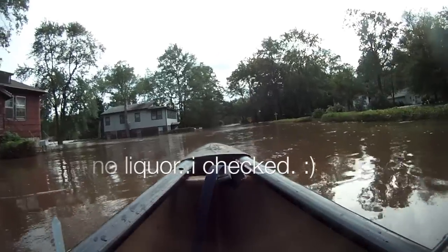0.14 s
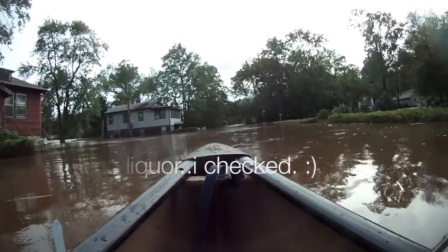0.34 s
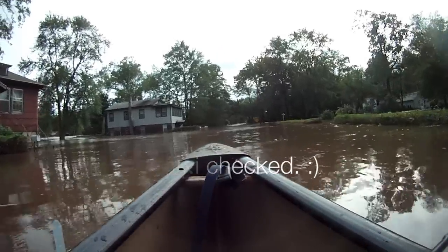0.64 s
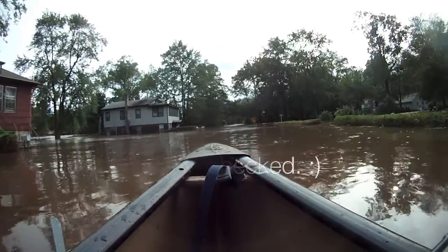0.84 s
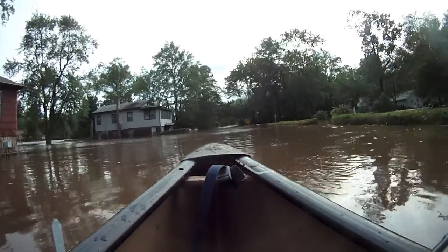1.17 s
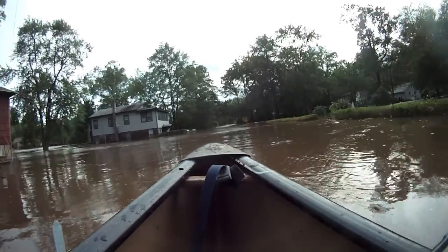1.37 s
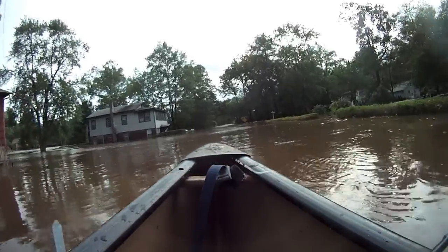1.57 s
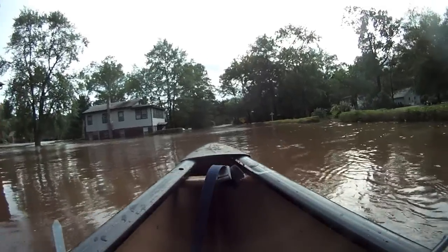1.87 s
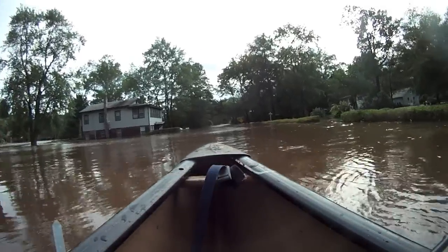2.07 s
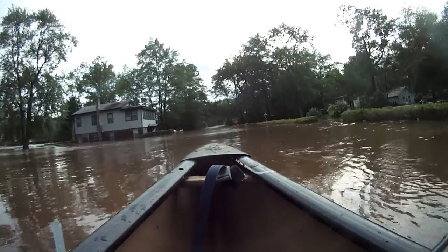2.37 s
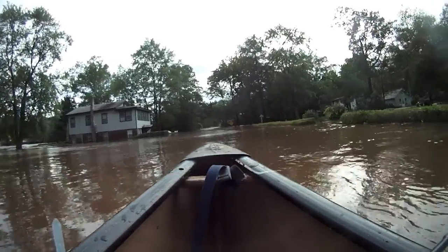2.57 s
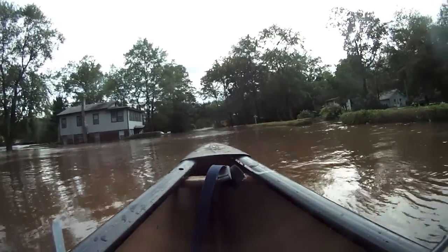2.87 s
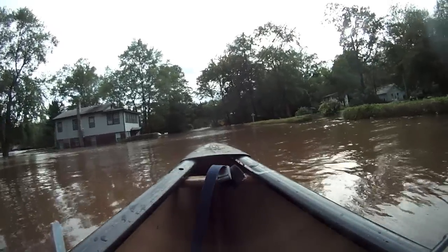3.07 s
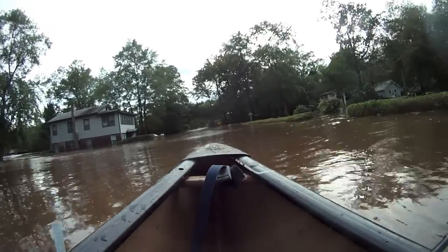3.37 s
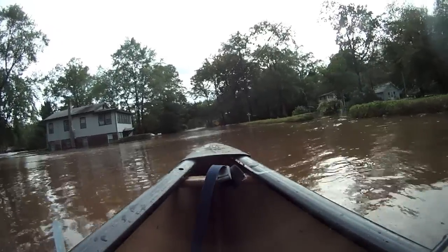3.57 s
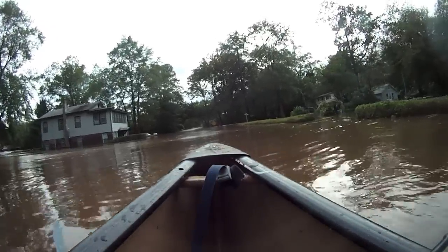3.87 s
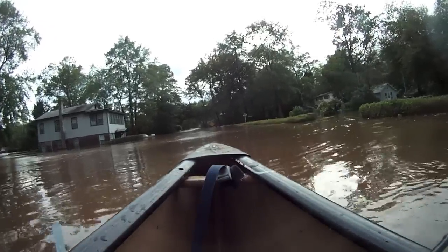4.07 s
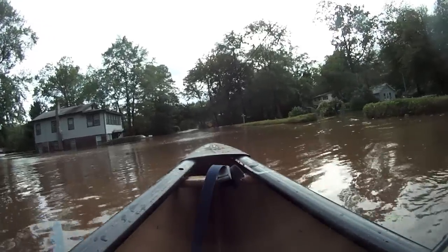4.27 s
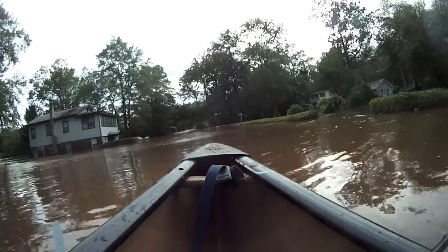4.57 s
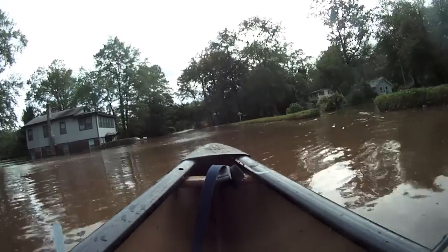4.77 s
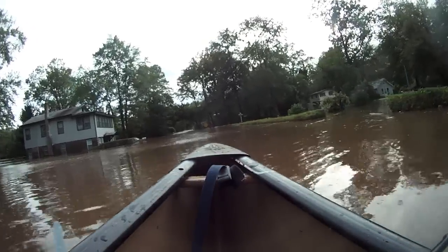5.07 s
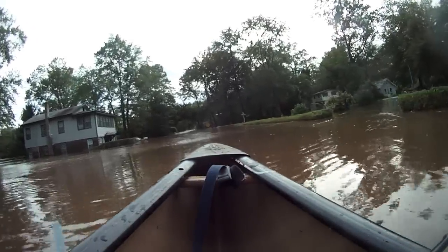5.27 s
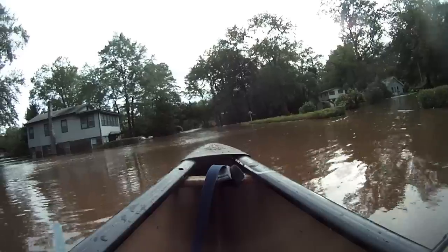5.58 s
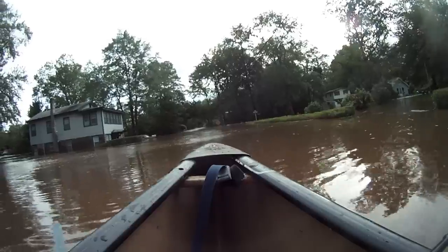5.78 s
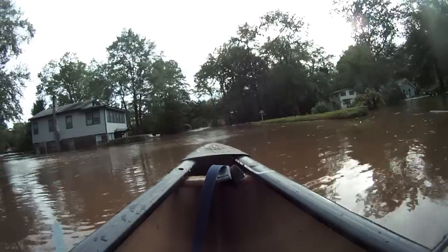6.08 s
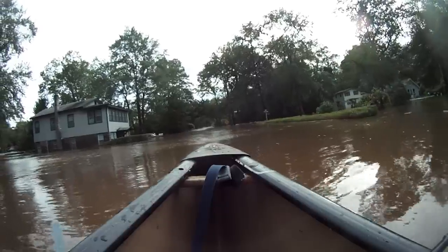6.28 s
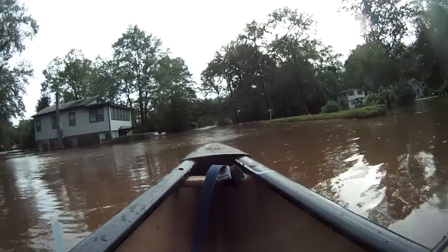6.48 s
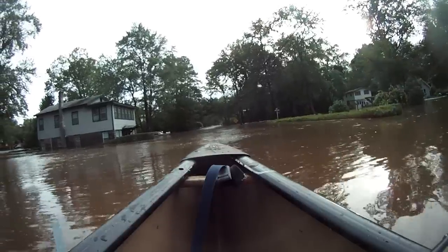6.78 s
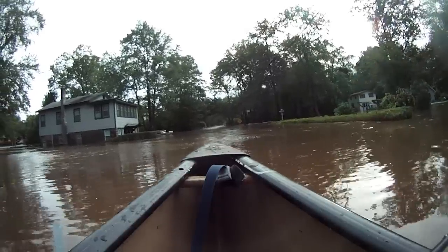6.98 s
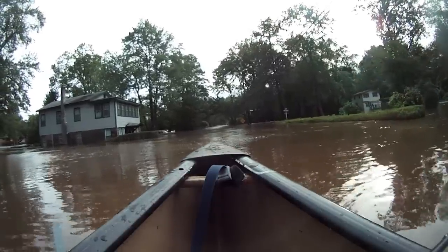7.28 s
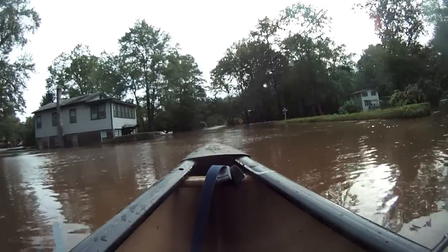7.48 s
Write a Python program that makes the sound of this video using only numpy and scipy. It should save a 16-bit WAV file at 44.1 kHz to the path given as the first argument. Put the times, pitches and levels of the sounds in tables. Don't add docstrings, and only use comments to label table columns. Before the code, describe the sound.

Quiet floodwater laps along a drifting canoe, close and boxed-in inside a waterproof case. Small bumps lead to one dominant, deep, soft-edged hull thump, followed by rumbling and plinking droplets. The water then thins, with scattered low knocks and wavelet slaps, a firmer fluttering cluster late on, and a final patter of drips and light taps. The sound is nearly mono, with gritty, coarse treble.

```python
import sys
import numpy as np
from scipy import signal
from scipy.fft import rfft, irfft, next_fast_len
from scipy.io import wavfile
from scipy.ndimage import uniform_filter1d, map_coordinates

SR = 44100
rng = np.random.default_rng(int(sys.argv[2]) if len(sys.argv) > 2 else 0)


def dump_mix(stems):
    frames = np.atleast_2d(stems).T
    limited = np.clip(frames, -1, 1)
    pcm = np.round(limited * 32767).astype(np.int16)
    wavfile.write(sys.argv[1], SR, pcm)


def to_linear_factor(level_db):
    exponent = np.asarray(level_db, float) / 20
    return 10 ** exponent


N = 336483

# f/Hz, arrival delay/s, swell time/s, pitch wander/Hz, twin mode f/Hz, twin level/dB
HULL_MODES = [
    (40.3, 0.024, 0.042, 1.16, 33, -18),
    (63, 0.0053, 0.063, 1.493, 44, -12.5),
    (81.6, 0.0076, 0.043, 2.54, 96, -9.5),
    (113.4, 0.0018, 0.02, 3.93, 132, -13),
    (171.3, 0.0013, 0.02, 10, 215, -4),
]
# f/Hz, level/dB per Hz
CASE_RESPONSE = [(820, -33.5), (1400, -12), (1520, -12), (1840, -10.5), (2050, -2), (2180, -0.5),
                 (2590, -9), (2810, -11), (3070, -4), (3410, -8), (3630, -5), (4430, -13), (5410, -15),
                 (6010, -35.5), (6200, -18), (8060, -59.5), (13600, -120)]


def unit(x):
    return x / np.sqrt(np.mean(x ** 2) + 1e-20)


def wobble(rate):
    knots = rng.standard_normal(int(N * rate / SR) + 4)
    return map_coordinates(knots, [np.arange(N) * rate / SR])


def coloured(x, points):
    m = 2 * next_fast_len(N // 2 + 4096)
    hz, db = np.transpose(points)
    log_hz = np.log(np.fft.rfftfreq(m, 1 / SR) + 1)
    gain = to_linear_factor(np.interp(log_hz, np.log(hz + 1), np.maximum(db, -90)))
    cepstrum = irfft(np.log(gain), m)
    cepstrum[1:m // 2] *= 2
    cepstrum[m // 2 + 1:] = 0
    return irfft(rfft(x, m) * np.exp(rfft(cepstrum)), m)[:N]


def add(into, s, sound):
    start = round(s * SR)
    sound = sound[max(-start, 0):]
    part = into[max(start, 0):][:len(sound)]
    part += sound[:len(part)]


def swell(t, rise):
    return t / rise * np.exp(1 - t / rise)


def microphone_hiss():
    # f/Hz, level/dB per Hz
    hiss_shape = [(1000, -26), (3000, -9), (4600, -1), (5550, 5.5), (5950, -22), (6200, -58)]
    return to_linear_factor(-78) * unit(coloured(rng.standard_normal(N), hiss_shape))


def wash():
    # t/s, fizz level/dB
    flow = [(0, -61), (.5, -61), (.9, -60.5), (1.05, -60.5), (1.3, -61), (1.7, -61.5), (2.3, -61.5),
            (3, -62.5), (3.7, -63), (4.5, -64), (5.2, -63), (5.7, -62.5), (6.3, -63.5), (6.75, -63),
            (7.1, -62.5), (7.4, -61.5), (7.63, -62)]
    # t/s, rise/dB, swell time/s
    splashes = [(0.29, 2, 0.0097), (0.455, 4, 0.016), (0.94, 2, 0.033), (1.04, 2, 0.028),
                (2.08, 2.5, 0.024), (2.74, 2.5, 0.045), (4.875, 2, .015), (5.19, 2, 0.014),
                (6.77, 2, 0.013), (7.16, 2.5, .04), (7.41, 2, 0.01), (7.61, 0, .015)]
    # f/Hz, level/dB per Hz
    lapping = [(13, -43.5), (22, 1), (48, -1), (92, -4), (198, -14.5), (480, -20), (1190, -24), (1500, -31),
               (1850, -33), (2200, -22.5), (2860, -42.5), (4840, -120)]
    lap_level_db, lap_follows = -56, 0.36
    t = np.arange(N) / SR
    flow_db = np.interp(t, *np.transpose(flow))
    lift_db = np.zeros(N)
    for s, db, rise in splashes:
        add(lift_db, s, db * swell(t[:SR // 2], rise) ** 2)

    flicker = to_linear_factor(0.22 * wobble(10) + 0.34 * wobble(40) + 0.55 * wobble(250))
    fizz = unit(coloured(flicker * rng.standard_normal(N), CASE_RESPONSE))
    lap = unit(coloured(to_linear_factor(0.6 * wobble(14)) * rng.standard_normal(N), lapping))
    lap_db = lap_level_db + lap_follows * (flow_db - flow_db.mean())
    return to_linear_factor(flow_db + lift_db) * fizz + to_linear_factor(lap_db) * lap


def bumps():
    # t/s, peak level/dB, hardness/dB per mode upward
    blows = [(0.0, -41.5, 1.5), (0.22, -44, -1.5), (0.92, -22.5, -1.5), (0.96, -22.5, -1.5),
             (1.04, -34, 1.5), (1.26, -45, -4), (1.45, -46.5, 0), (1.805, -40, 2), (2.04, -52, 0.5),
             (3.465, -52, 4), (3.515, -44.5, 1), (3.88, -49.5, 2.5), (4.365, -47.5, 1.5), (5.765, -47, 5.5),
             (7.37, -55, 0.5), (7.49, -56, 6)]
    blow_db = [0.5, -6, -7, -14.5, -28]
    # t/s, peak level/dB
    rocks = [(0.09, -39), (0.405, -42), (0.58, -51), (1.15, -36), (1.6, -51), (1.86, -42), (2.64, -54),
             (2.76, -49.5), (2.84, -46), (3.1, -52), (3.64, -50), (3.78, -50), (4.375, -42), (5.06, -56),
             (5.17, -53), (5.78, -45.5), (5.84, -43.5), (5.895, -40), (6.01, -50), (6.16, -44.5),
             (6.405, -46.5), (6.74, -48), (6.95, -60), (7.1, -48.5), (7.23, -55.5)]
    # t/s, peak level/dB, panel f/Hz
    slaps = [(-0.04, -43, 71), (0.07, -47, 96), (0.42, -48.5, 91.5), (0.58, -68, 125), (0.77, -49, 61.7),
             (0.78, -61, 114), (1.15, -49, 82), (1.86, -42, 63), (1.92, -47, 84), (2.5, -48.5, 68),
             (2.76, -57, 62), (3.455, -39, 71.5), (3.64, -51, 82.4), (3.78, -55, 80), (3.94, -44, 97.5),
             (4.78, -55.5, 82), (4.96, -44.5, 88.5), (4.96, -61, 172), (5.06, -41.5, 92),
             (5.26, -49.5, 84.4), (5.52, -60, 83), (5.768, -36, 116), (5.79, -35, 92), (5.85, -43, 100),
             (5.92, -45, 96), (6.42, -63, 62), (6.55, -44, 97), (6.55, -57, 165), (7.23, -66, 63)]
    panel_loss_db = 42
    hz = np.array(HULL_MODES)[:, 0]
    mode = np.arange(len(hz))
    contacts = [(s, db + np.array(blow_db) + hardness * mode) for s, db, hardness in blows]
    local = [(s, db, hz[0]) for s, db in rocks] + list(slaps)
    for s, db, panel_hz in local:
        contacts.append((s, db - panel_loss_db * np.abs(np.log2(hz / panel_hz))))
    return contacts


def hull():
    lead_s = 0.013
    t = np.arange(SR // 2) / SR
    out = np.zeros(N)
    contacts = bumps()
    for k, (hz, delay, rise, wander_hz, twin_hz, twin_db) in enumerate(HULL_MODES):
        shape = swell(np.maximum(t - delay, 0), rise) ** 3
        energy = np.zeros(N)
        for s, peak_db in contacts:
            add(energy, s - lead_s, to_linear_factor(peak_db[k]) ** 2 * shape)
        main = np.sin(2 * np.pi * np.cumsum(hz + wander_hz * wobble(8)) / SR)
        twin = np.sin(2 * np.pi * np.cumsum(twin_hz + wander_hz * wobble(8)) / SR)
        out += np.sqrt(energy) * (main + to_linear_factor(twin_db + 2.1 * wobble(14)) * twin)
    return out


def knocks():
    rail_hz = np.array([600, 319, 889, 1200])
    # t/s, peak level/dB, struck f/Hz, swell
    # time/s
    taps = [(0.065, -52.5, 430, 0.0076), (0.697, -59, 680, 0.023), (0.8, -59, 1150, 0.0067),
            (1.483, -55, 760, 0.0058), (1.788, -60, 950, .0061), (2.033, -53, 740, 0.0042),
            (2.566, -50.5, 450, 0.011), (2.562, -59, 1190, .008), (3.248, -64, 320, .008),
            (3.835, -52.5, 330, .011), (4.896, -66, 750, 0.013), (5.779, -51, 320, 0.0058),
            (6.17, -57, 540, .0097), (6.585, -50.5, 567, 0.011), (6.58, -53.5, 320, .014),
            (7.43, -56.5, 600, .013), (7.489, -51, 330, .0058), (7.608, -63, 700, .008),
            (0.96, -63, 400, .03), (1.03, -63, 500, 0.022), (2.045, -65, 590, .015),
            (7.445, -63, 600, 0.013), (0.0, -44, 800, .0008), (0.63, -57, 320, .006)]
    rail_loss_db = 19
    t = np.arange(SR // 8) / SR
    out = np.zeros(N)
    noise = rng.standard_normal((len(taps), len(rail_hz), len(t)))
    for (s, db, hz, rise), shake in zip(taps, noise):
        rough = 1 + 6.5 * uniform_filter1d(shake, size=90, axis=1)
        pitch = rail_hz * (1 + 0.0314 * shake[:, 0])
        share = to_linear_factor(-rail_loss_db * np.log2(rail_hz / hz) ** 2)
        ring = share @ (rough * np.sin(2 * np.pi * np.outer(pitch, t)))
        add(out, s, to_linear_factor(db - 3.5) * swell(t, 0.71 * rise) * ring)
    return out


def drips():
    # t/s, peak level/dB, f/Hz
    case_drips = [(0.3002, -48, 2110), (0.4549, -50, 2330), (0.4683, -41.5, 2130), (0.4753, -43, 2090),
                  (1.045, -44, 2150), (0.7322, -50, 2220), (0.7442, -41.5, 2110), (0.7921, -49, 2100),
                  (0.8749, -53, 2180), (0.9193, -51, 1960), (0.944, -42.5, 2180), (1.0287, -48, 2140),
                  (1.1154, -43, 2060), (1.1782, -51, 2070), (1.3907, -44, 2260), (1.4421, -46, 2230),
                  (1.5279, -49, 2100), (2.0991, -48, 2310), (2.1141, -45, 2150), (2.9352, -48, 2110),
                  (3.1637, -53, 2120), (4.9257, -49.5, 2300), (5.1996, -52, 2050), (5.5318, -54, 2160),
                  (5.6396, -50, 2150), (7.0224, -46.5, 2140), (7.1611, -41, 2140), (7.173, -43, 2110),
                  (7.4185, -49.5, 2114), (7.5704, -48.5, 2220)]
    # t/s, peak level/dB, f/Hz, swell time/s
    droplets = [(.188, -47, 2400, 0.003), (.450, -52, 3830, .003), (.462, -43.5, 3150, 0.002),
                (0.946, -41, 1300, 0.0012), (0.9457, -37, 1670, 0.00086), (1.078, -54, 3270, 0.0037),
                (1.404, -47, 3250, .002), (1.620, -51.5, 1830, 0.0035), (1.936, -51, 3130, 0.0017),
                (2.790, -53, 2250, 0.0057), (2.862, -47, 2470, 0.0016), (3.4735, -56, 2290, .005),
                (5.194, -52.5, 3920, .003), (5.190, -55, 2340, .003), (5.330, -50, 2520, 0.0018),
                (5.922, -45, 4300, .0008), (5.925, -56, 2970, .003), (6.780, -47, 2880, 0.0012),
                (7.160, -48, 3170, 0.0018), (7.160, -53, 1160, .003), (7.206, -52, 3230, .002),
                (7.212, -54, 3000, .002), (7.219, -53.5, 1110, 0.0068), (7.273, -53, 4160, 0.0017),
                (7.276, -56, 3200, 0.0018), (7.4814, -51, 2320, 0.0047), (7.595, -57, 1150, .003),
                (1.983, -53, 2450, .004), (7.622, -46, 2100, .003), (2.285, -52, 2130, 0.0034)]
    # t/s, peak level/dB, swell time/s
    mount_ticks = [
        (.9455, -46, 0.00085),
        (.986, -44, 0.0027),
        (1.405, -48, 0.0022),
        (5.193, -53, .004),
        (7.161, -57, 0.0018),
        (5.923, -49, .001),
        (6.779, -49, 0.0011),
    ]
    t = np.arange(SR // 20) / SR
    out, ticks = np.zeros(N), np.zeros(N)
    blips = list(droplets)
    for s, db, hz in case_drips:
        rise = 0.0042 * np.exp(-0.045 * (db + 56))
        blips.append((s, db, hz, rise))
    for s, db, hz, rise in blips:
        blip = np.sin(2 * np.pi * hz * (.98 * t + 1.15 * t * t))
        add(out, s, to_linear_factor(db - 5.5) * swell(t, rise) * blip)
    for s, db, rise in mount_ticks:
        add(ticks, s, to_linear_factor(db) * swell(t, rise) * rng.standard_normal(len(t)))
    return out + to_linear_factor(8.5) * coloured(ticks, CASE_RESPONSE)


def scene():
    mono = microphone_hiss() + wash() + hull() + knocks() + drips()
    return np.tile(mono, (2, 1))


def band_limit(x):
    return signal.sosfilt(signal.butter(12, 15300, fs=SR, output="sos"), x)


def record(dry):
    # f/Hz, level/dB
    dither = [(30, -34), (110, -13.5), (300, 1.5), (1200, 4), (5400, 0.5), (6000, -26), (6800, -2),
              (8200, -5), (8400, -60)]
    fine_hz, hold_hz = 48000, 12000
    step = fine_hz // hold_hz
    fine = signal.resample_poly(dry[0], fine_hz // 300, SR // 300)
    held = np.repeat(fine[::step], step)
    mono = signal.resample_poly(held, SR // 300, fine_hz // 300)[:N]
    side = to_linear_factor(-78.0) * unit(coloured(rng.standard_normal(N), dither))
    return band_limit(np.array([mono + side, mono - side]))


dry = scene()
out = record(dry)
dump_mix(out)
```